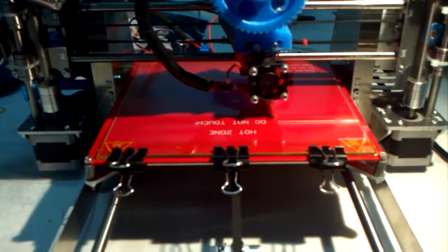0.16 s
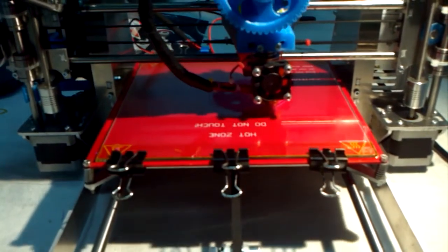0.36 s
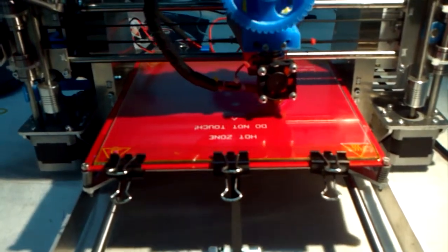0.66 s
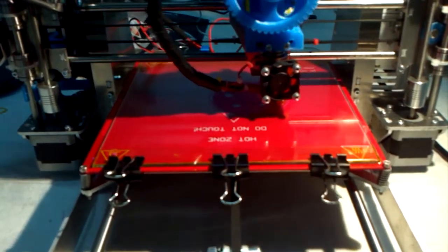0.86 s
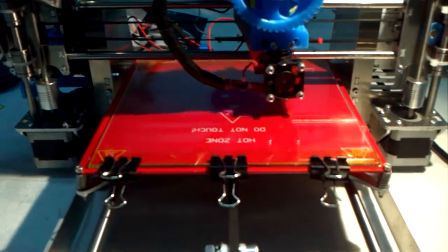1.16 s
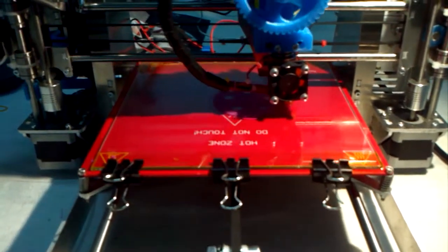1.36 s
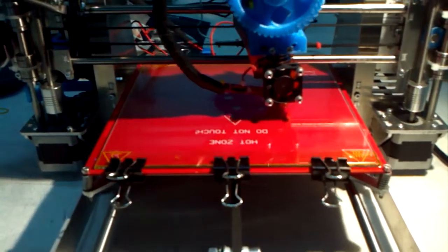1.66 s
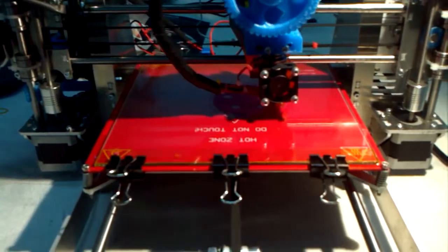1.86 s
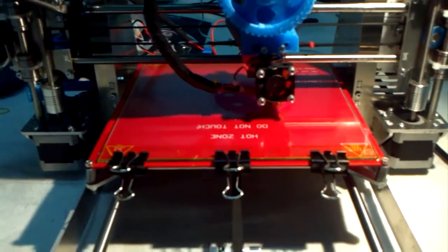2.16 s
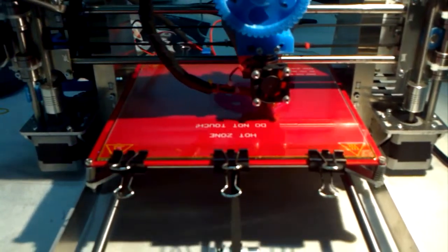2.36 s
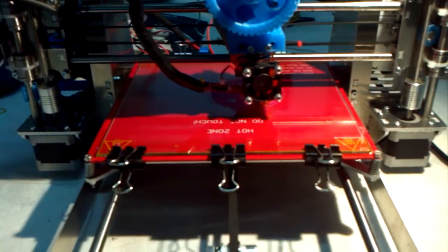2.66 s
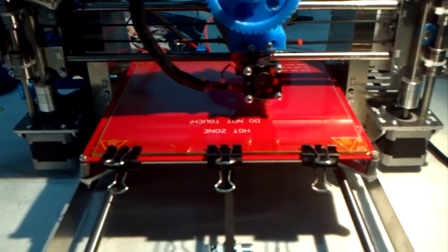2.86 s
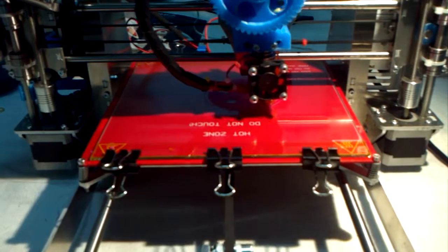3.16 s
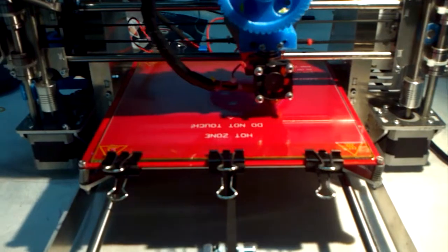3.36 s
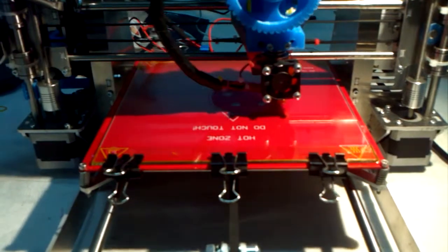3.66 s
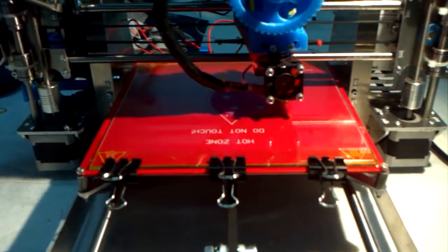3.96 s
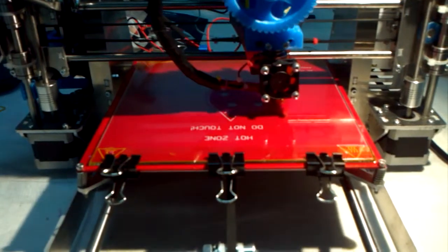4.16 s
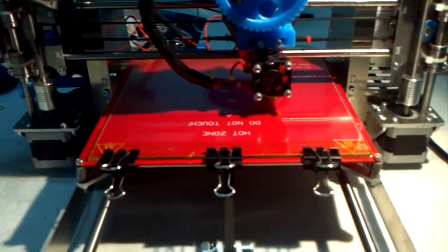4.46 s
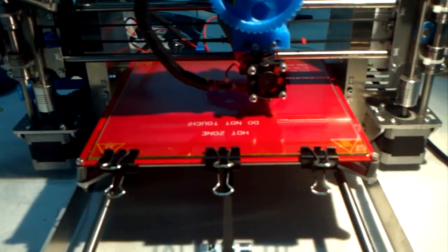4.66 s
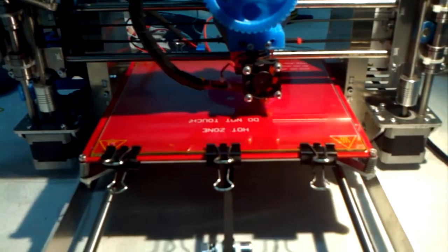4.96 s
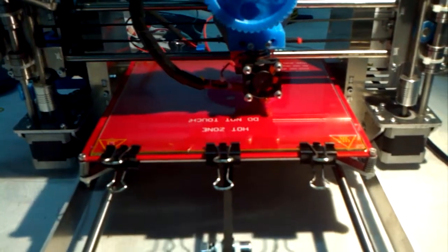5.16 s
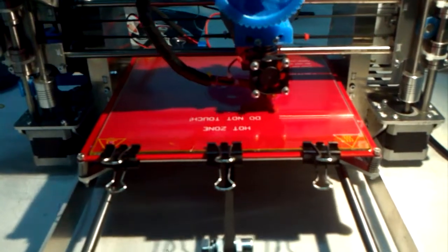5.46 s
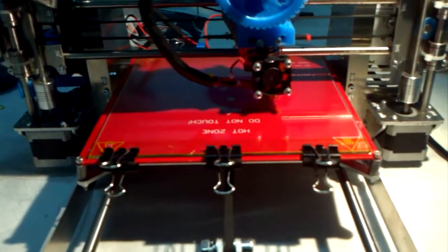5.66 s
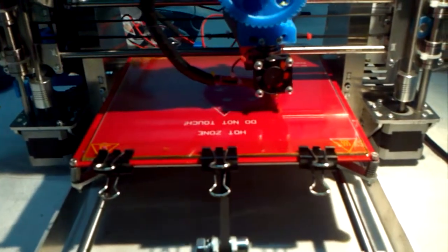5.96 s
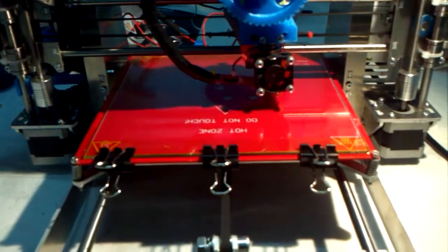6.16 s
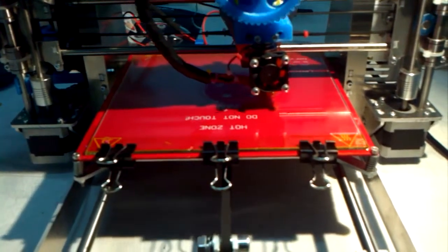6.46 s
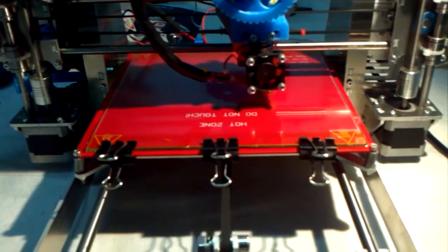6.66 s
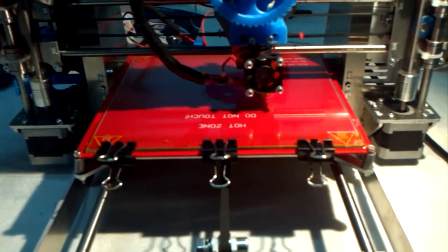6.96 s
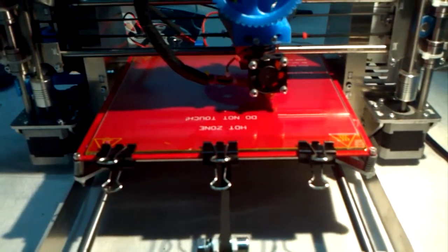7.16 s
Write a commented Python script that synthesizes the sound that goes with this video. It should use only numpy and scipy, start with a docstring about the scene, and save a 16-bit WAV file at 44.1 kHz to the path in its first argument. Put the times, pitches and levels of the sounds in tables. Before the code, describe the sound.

A desktop 3D printer is running from the start, heard close up, with a small cooling fan giving a steady hum and soft rush of air. The motors drone through each stroke with a thin whine that holds its pitch but changes in strength. The motion reverses at about 1.5, 2.9, 4.1, 5.2, 6.2 and 7.1 seconds, each time with a tiny break in the drone, a soft thud and a short rattle. The whine fades near 0.8 seconds, swells around 2, fades near 3.7, swells at 4.5, dips near 5.9 and rises again at 6.4. A low, pulsing hum comes forward from about 1.5 to 2.9 seconds and from 4.1 to 5.2. Loose bearings tick and chatter irregularly on the metal rods throughout, several times a second. The printer is still working at the end, around 7.5 seconds.

```python
"""Desktop 3D printer laying diagonal lines.

The steppers whine and drone through the frame on every stroke. Loose bearings chatter on the rods,
and each reversal shakes the frame with a thud and a short rattle. A small cooling fan hums
throughout. The sound is close and narrow in band."""
import sys
import numpy as np
from scipy.fft import rfft, irfft, next_fast_len
from scipy.io import wavfile
from scipy.ndimage import map_coordinates

SR = 44100
rng = np.random.default_rng(int(sys.argv[2]) if len(sys.argv) > 2 else 0)


def digitize_waveform(pressure):
    """Quantize a signal to 16-bit integers and store it at the path in sys.argv[1].

    Rows of a 2-D input are taken as channels; values are limited to [-1, 1].
    """
    field = np.atleast_2d(pressure).T
    bounded = np.clip(field, -1, 1)
    quanta = np.round(bounded * 32767).astype(np.int16)
    wavfile.write(sys.argv[1], SR, quanta)


N = 322810

TRAVEL_HZ, FEED_HZ = 23.558, 45.72  # base rates of the travel motors and the filament feed
SHUDDER_HZ = 3 * TRAVEL_HZ  # carriage vibration


def amp(db):
    """Decibels to gain."""
    return 10 ** (np.asarray(db) / 20)


def unit(x):
    """Scale to rms 1."""
    return x / np.sqrt(np.mean(x ** 2) + 1e-20)


def clock():
    """Sample times in seconds."""
    return np.arange(N) / SR


def wobble(rate_hz):
    """Smooth random curve, rate_hz knots a second."""
    knots = rng.standard_normal(int(N * rate_hz / SR) + 4)
    coarse = np.arange(0, N + 64, 64)
    return np.interp(np.arange(N), coarse, map_coordinates(knots, [coarse * rate_hz / SR]))


def filtered(x, response):
    """Apply a complex frequency response."""
    size = next_fast_len(N + SR // 2)
    return irfft(rfft(x, size) * response(np.fft.rfftfreq(size, 1 / SR)), size)[:N]


def coloured(x, points):
    """Apply a gain curve through (Hz, dB) points."""
    hz, db = np.transpose(points)
    return filtered(x, lambda f: amp(np.interp(np.log(f + 1), np.log(hz), db)))


def resonance(f, centre_hz, width_hz):
    """Second-order band-pass response."""
    return 1j * f * width_hz / (centre_hz ** 2 - f * f + 1j * f * width_hz)


def ringing(x, modes):
    """Apply parallel (Hz, width Hz, dB) resonances of alternating sign."""
    return filtered(x, lambda f: sum((-1) ** k * amp(db) * resonance(f, hz, width_hz)
                                     for k, (hz, width_hz, db) in enumerate(modes)))


def tone(hz, flutter_db, flutter_hz, jitter_rad):
    """Partial of rms about 1, wavering in level and phase."""
    cycles = np.cumsum(np.broadcast_to(hz, N)) / SR + rng.random()
    phase = 2 * np.pi * cycles + jitter_rad * wobble(flutter_hz)
    return np.sqrt(2) * np.sin(phase) * amp(flutter_db * wobble(flutter_hz))


def contacts(rate_hz):
    """Sparse tiny impacts of random size, rms 1."""
    return unit((rng.random(N) < rate_hz / SR) * rng.standard_normal(N))


def strokes(pause_s=.036, ramp_s=.014):
    """Per sample: a run gate that drops to 0 just before each stroke, and the stroke's settings."""
    # Carriage strokes. Each row: start in seconds, early and late whine in dB, midpoint and time
    # constant of that change in seconds, hum in dB, beat in Hz, feed and belt base levels in dB,
    # belt tilt in dB per octave, frame murmur in dB, light tick strength in dB.
    moves = np.array([(-0.1, -53, -73, .82, .11, -75, 2.8, -63, -81, -7, -61, -58),
                      (1.483, -54, -48.5, 2.16, 0.29, -62, 2.98, -76, -62, 1.5, -60, -56.5),
                      (2.862, -53, -74, 3.7, 0.11, -72.5, 3, -63.5, -78, 0, -59.5, -62),
                      (4.107, -56, -50, 4.47, 0.13, -60, 3.46, -66.5, -67.5, -5.5, -62.5, -57.5),
                      (5.252, -52.5, -61.5, 5.91, .08, -73.5, 3, -70, -71.5, 0, -59, -56),
                      (6.24, -55, -50, 6.4, 0.096, -75, 2.3, -63, -80, -1, -60, -55.5),
                      (7.075, -51.5, -52.6, 7.2, .1, -61.5, 1.7, -63.5, -72, -7, -60, -52)])
    t, starts_s = clock(), moves[1:, 0]
    halted = sum(np.clip(np.minimum(t - s + pause_s, s - t) / ramp_s + .5, 0, 1) for s in starts_s)
    return 1 - halted, moves[np.searchsorted(starts_s, t)].T


def rods(blows, crack_db):
    """Impacts ring the rods, with a bare contact crack on top; power is kept."""
    # Rod and carriage modes. Each row: centre in Hz, width in Hz, relative gain in dB.
    modes = [(1747, 310, -9), (2030, 450, -15.5), (2450, 130, -5.5), (2740, 560, -14), (3244, 205, 1.5),
             (4029, 240, 0), (4915, 620, 0.5), (5200, 210, -2.5), (5400, 360, 0), (5746, 220, 1),
             (6125, 350, -3), (6540, 330, -5), (7290, 430, -17)]
    # Bare contact spectrum. Each row: frequency in Hz, relative level in dB.
    crack_spectrum = [(100, -41), (300, -4.5), (700, -6), (1300, -5.5), (2500, 3.5), (6500, -15.5),
                      (7400, -3), (8200, -1.5)]
    ring = filtered(blows, lambda f: sum(amp(db) * resonance(f, hz, width_hz) ** 2
                                         for hz, width_hz, db in modes))
    crack = amp(crack_db) * unit(coloured(blows, crack_spectrum))
    return unit(unit(ring) + crack) * np.std(blows)


def fan(blades=7, tone_gain_db=-.8, air_db=-56.5):
    """Cooling fan: blade tones over a steady rush of air."""
    # Fan drift. Each row: time in seconds, blade-pass rate in Hz, base level in dB.
    drift = [(0.2, 861, -59), (0.47, 856.6, -61), (3.88, 857.5, -59), (4.55, 859, -59),
             (6.48, 856.1, -60.5), (7.2, 855.2, -62)]
    # Fan partials. Each row: multiple of the rotation rate, relative level in dB.
    orders = [(1, -13), (2, -25), (4, -6.5), (7, 0.5), (14, -12.5), (21, -19.5)]
    # Air rush spectrum. Each row: frequency in Hz, relative level in dB.
    air_spectrum = [(26, -64.5), (45, -22.5), (216, -2), (776, -11.5), (848, -6.5), (1080, -9.5),
                    (1180, -7), (1540, -13.5), (3980, -16), (4250, -18.5), (4740, -15), (6900, -18),
                    (7380, -22), (7880, -35), (8800, -49), (11400, -80), (19400, -120)]
    times_s, *columns = np.transpose(drift)
    blade_hz, base_db = (np.interp(clock(), times_s, column) for column in columns)
    tones = sum(amp(tone_gain_db + base_db + db)
                * tone(k * blade_hz / blades, flutter_db=.4, flutter_hz=18, jitter_rad=.06)
                for k, db in orders)
    return tones + amp(air_db) * unit(coloured(rng.standard_normal(N), air_spectrum))


def rolling_bearings(sizzle_db=-64):
    """Rolling bearings keep the frame murmuring and the rods sizzling in time with the motors."""
    # Frame and bed modes. Each row: centre in Hz, width in Hz, relative gain in dB.
    frame_modes = [(139, 20, -11.5), (216.8, 18, -5.5), (258, 39, -1), (308, 20, -11), (463, 68, -14.5),
                   (672, 180, -17.5), (964, 37, -16), (1780, 86, -19.5), (2503, 73, -26.5)]
    t = clock()
    _, (*_, murmur_db, _) = strokes()
    murmur = amp(murmur_db) * unit(ringing(rng.standard_normal(N), frame_modes))
    pulsing = 1 + .7 * np.sin(2 * np.pi * SHUDDER_HZ * t) + .5 * np.sin(2 * np.pi * FEED_HZ * t)
    sizzle = rods(contacts(rate_hz=4000) * pulsing, crack_db=3)
    return murmur + amp(sizzle_db) * unit(sizzle)


def light_ticks(hz, chance, phase_cycles=.35, spread_db=1.1):
    """Rows of (seconds, dB): a vibration now and then throws a bearing, at one point in its cycle."""
    _, (*_, tick_db) = strokes()
    times_s = (np.arange(int(N / SR * hz) - 1) + phase_cycles) / hz
    db = tick_db[(times_s * SR).astype(int)] + spread_db * rng.standard_normal(len(times_s))
    return np.c_[times_s, db][rng.random(len(times_s)) < chance]


def chatter(bounce_s=.0024, rebound=.59, grit_db=-25, grit_decay_s=.005, rms_span_s=.008):
    """A loose bearing strikes, rebounds three times and buzzes out: hard ticks among light ones."""
    # Hard bearing ticks. Each row: start in seconds, relative level in dB.
    hard_ticks = [(0.133, -43), (0.2643, -41.5), (0.381, -43.5), (0.442, -44.5), (0.5274, -41),
                  (0.5723, -42.5), (0.8346, -42), (0.9676, -44), (1.0984, -44), (1.4058, -41),
                  (1.6763, -39.5), (1.7577, -41.5), (1.8877, -41), (1.9165, -39), (2.0433, -39.5),
                  (2.1102, -41), (2.324, -41), (2.4642, -40), (2.608, -40.5), (2.6256, -43.5),
                  (2.6897, -40.5), (2.82, -38), (2.8918, -38), (3.6177, -39), (3.727, -41), (4.1126, -36),
                  (4.264, -40), (4.3641, -39.5), (4.4844, -39), (4.5328, -40), (4.5752, -38),
                  (4.7624, -42.5), (5.1753, -38.5), (5.3567, -41.5), (5.6494, -42), (5.681, -43.5),
                  (5.9364, -42.5), (6.049, -38), (6.0922, -42), (6.1362, -40), (6.2622, -39.5),
                  (6.329, -40), (6.4597, -40.5), (6.5685, -39), (6.8532, -39.5), (7.2654, -38.5)]
    ticks = np.vstack([np.array(hard_ticks) - [0, 12],  # less a 12 dB crest factor
                       light_ticks(FEED_HZ, chance=.22),
                       light_ticks(SHUDDER_HZ, chance=.15)])
    fade = np.exp(-clock()[:SR // 16] / grit_decay_s)
    blows = np.zeros(N + SR)
    for start_s, db in ticks:
        gaps_s = bounce_s * rng.uniform(.6, 1.5, size=3)
        strikes = (np.r_[0, np.cumsum(gaps_s)] * SR).astype(int)
        tick = amp(grit_db) * fade * rng.standard_normal(len(fade))
        tick[strikes] += rebound ** np.arange(4) * rng.choice([-1, 1], size=4)
        tick *= np.sqrt(rms_span_s * SR) / np.linalg.norm(tick)
        blows[int(start_s * SR):][:len(tick)] += amp(db) * tick
    return rods(blows[:N], crack_db=-9)


def reversals(thud_sigma_s=.017, bed_hz=258):
    """Each change of direction jolts the bed at its resonance and rattles the loose parts."""
    # Reversals. Each row: time in seconds, rattle in dB, rise and decay constant in seconds,
    # snap in dB, thud in dB, thud lag in seconds. Levels are before the mix gains.
    turns = [(.002, -47, 0.011, -67, -47.5, 0.0039), (1.475, -52.5, 0.012, -52, -46.5, 0.016),
             (2.853, -47, 0.015, -68, -46, 0.016), (4.093, -51.5, 0.018, -55, -45, .004),
             (5.245, -41.5, 0.014, -52.5, -45, 0.011), (6.229, -49.5, 0.01, -54, -45.5, 0.0045),
             (7.071, -43.5, 0.023, -56, -47, 0.0059)]
    # Hard, bright contact mode. One row: centre in Hz, width in Hz, relative gain in dB.
    snap_modes = [(6560, 1500, 0)]
    # Dull knock spectrum. Each row: frequency in Hz, relative level in dB.
    knock_spectrum = [(80, -17.5), (170, 5.5), (260, -12), (420, -3.5), (560, -15), (720, -6.5),
                      (1100, -14.5), (2000, -14), (4000, -23)]
    t = clock()
    rattle_env, snap_env, knock_env, thud = np.zeros((4, N))
    for time_s, rattle_db, tau_s, snap_db, thud_db, lag_s in turns:
        burst = np.exp(-np.abs(t - time_s) / tau_s)
        swell = amp(thud_db) * np.exp(-.5 * ((t - time_s - lag_s) / thud_sigma_s) ** 2)
        rattle_env += amp(rattle_db) * burst
        snap_env += amp(snap_db) * burst
        knock_env += swell
        thud += swell * np.sin(2 * np.pi * bed_hz * (t - time_s))
    grit = contacts(rate_hz=1500) + .5 * rng.standard_normal(N)
    rattle = rods(rattle_env * grit, crack_db=-2.5)
    snap = snap_env * unit(ringing(contacts(rate_hz=1500), snap_modes))
    knock = knock_env * unit(coloured(rng.standard_normal(N), knock_spectrum))
    return amp(1.5) * (rattle + thud) + snap + amp(-3.5) * knock


def steppers(whine_order=50, hum_order=8, second_motor_gain=.47):
    """Stepping whine swells or fades once a stroke; two motors' hums beat; belts and feed drone."""
    # Stepping overtones and sidebands. Each row: multiple of the travel rate, level in dB.
    step_orders = [(9, -71.5), (12, -74), (15, -67.5), (41, -68.5), (42, -78), (44, -75.5), (53, -74.5),
                   (100, -73), (150, -72.5), (153, -76), (165, -74.5), (194, -77), (197, -77), (200, -68.5),
                   (250, -76), (300, -82.5)]
    # Belt partials. Each row: multiple of the travel rate, relative level in dB.
    belt_orders = [(6, -3), (10, -7), (11, -7.5), (14, -0.5), (16, -9), (32, -18)]
    # Filament feed partials. Each row: multiple of the feed rate, relative level in dB.
    feed_orders = [(2, -13.5), (3, -10), (5, 1), (6, 1.5), (7, -9.5), (8, -0.5)]
    t = clock()
    running, stroke = strokes()
    start_s, early_db, late_db, middle_s, tau_s, hum_db, beat_hz, feed_db, belt_db, tilt_db, *_ = stroke

    change = .5 + .5 * np.tanh(.5 * (t - middle_s) / tau_s)
    whine = tone(whine_order * TRAVEL_HZ, flutter_db=.5, flutter_hz=14, jitter_rad=.03)
    whine *= amp(early_db + (late_db - early_db) * change)
    whine *= running + .18 * (1 - running)  # the frame rings on through each reversal

    hum = tone(hum_order * TRAVEL_HZ, flutter_db=2.5, flutter_hz=16, jitter_rad=.12)
    hum *= amp(hum_db) * np.abs(1 - second_motor_gain * np.exp(2j * np.pi * beat_hz * (t - start_s)))

    overtone = lambda k: tone(k * TRAVEL_HZ, flutter_db=.8, flutter_hz=14, jitter_rad=.13)
    steps = sum(amp(db) * overtone(k) for k, db in step_orders)
    belt = sum(amp(belt_db + db + tilt_db * np.log2(k * TRAVEL_HZ / 250)) * overtone(k)
               for k, db in belt_orders)
    feed = sum(amp(feed_db + db) * tone(k * FEED_HZ, flutter_db=1.3, flutter_hz=8.2, jitter_rad=.12)
               for k, db in feed_orders)
    return whine + hum + running * (steps + belt + feed)


def scene():
    """The whole printer from just in front of the bed, mono."""
    return (steppers() + fan() + rolling_bearings() + reversals() + chatter())[None]


def record(dry):
    """Overall band limit: deep bass is thinned; treble falls away above 7 kHz and ends at 9 kHz."""
    # Output response. Each row: frequency in Hz, gain in dB.
    response = [(20, -23.5), (50, -15), (90, -3), (6800, 1.5), (7300, 1), (7800, -11), (8500, -16),
                (9000, -24.5)]
    cutoff_hz = 9010
    return filtered(coloured(dry[0], response), lambda hz: hz < cutoff_hz)[None]


dry = scene()
out = record(dry)
digitize_waveform(out)
```